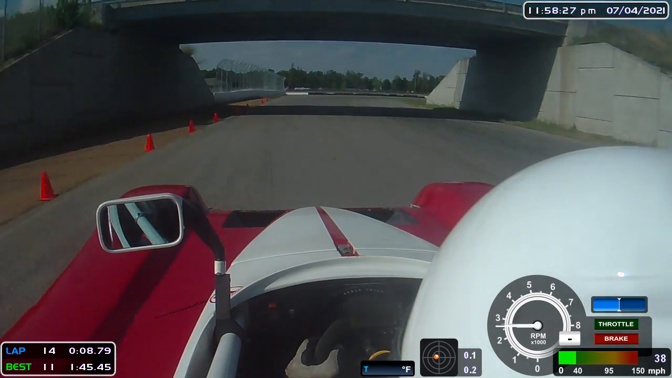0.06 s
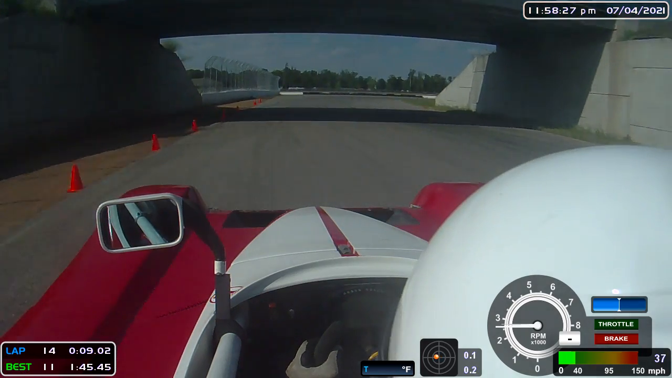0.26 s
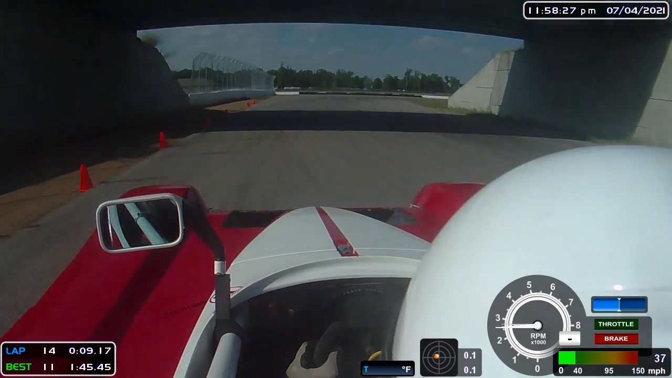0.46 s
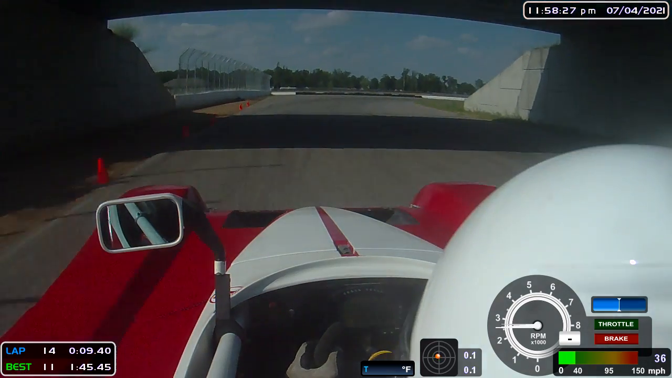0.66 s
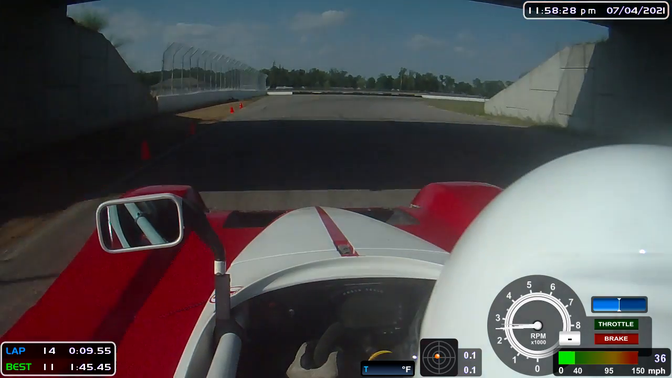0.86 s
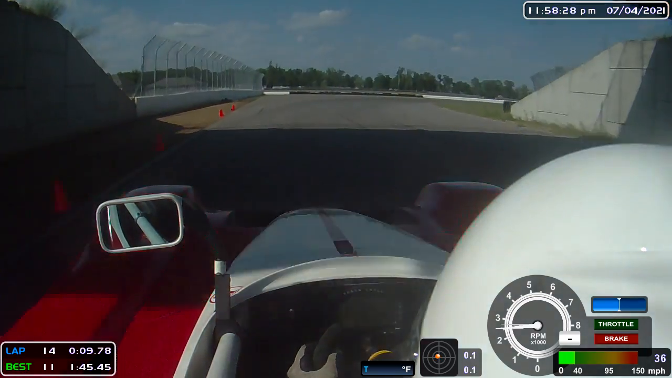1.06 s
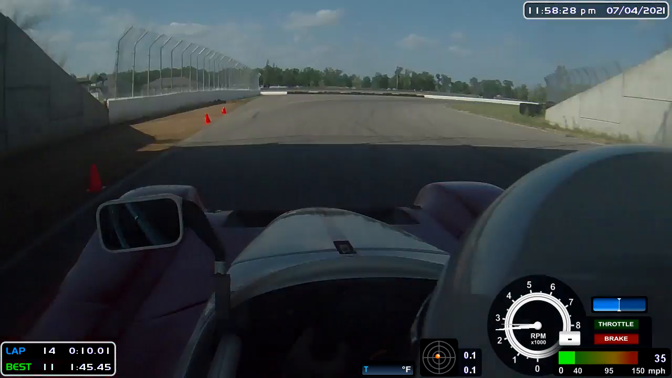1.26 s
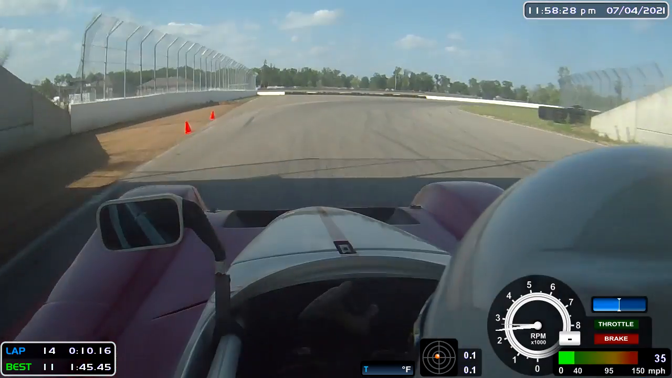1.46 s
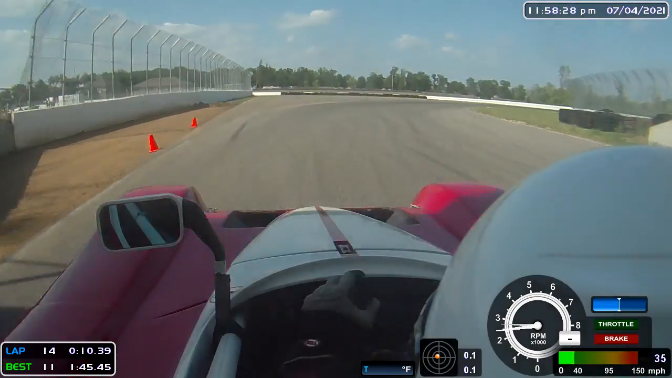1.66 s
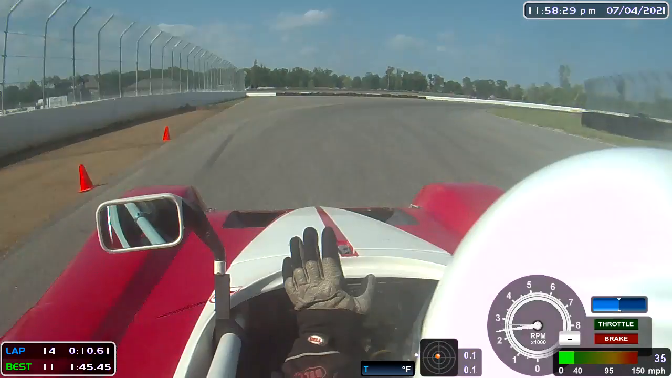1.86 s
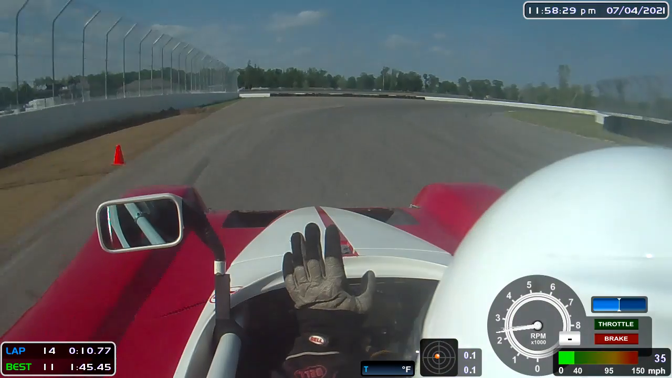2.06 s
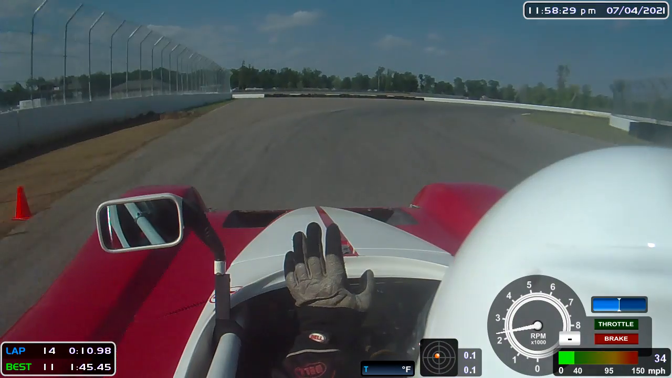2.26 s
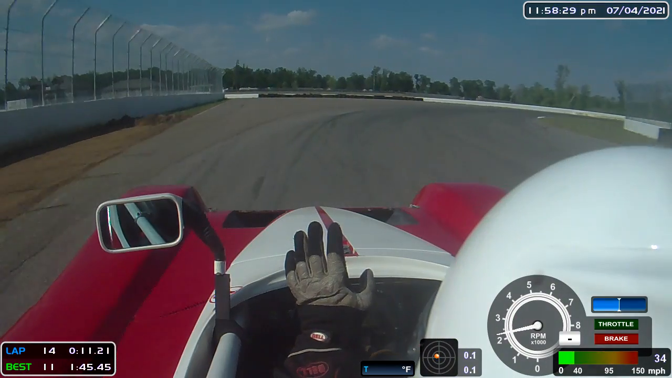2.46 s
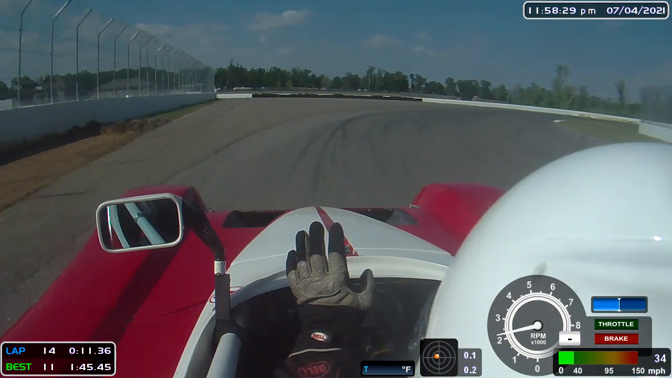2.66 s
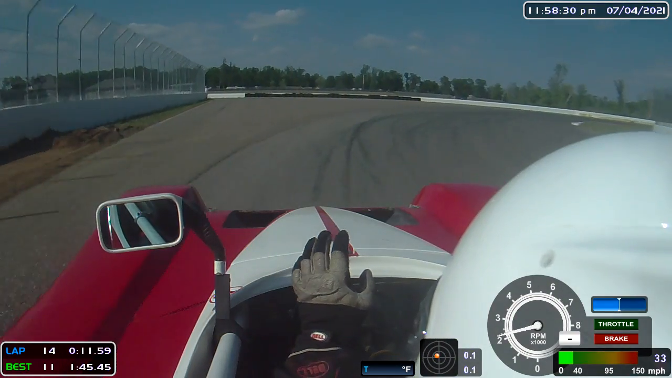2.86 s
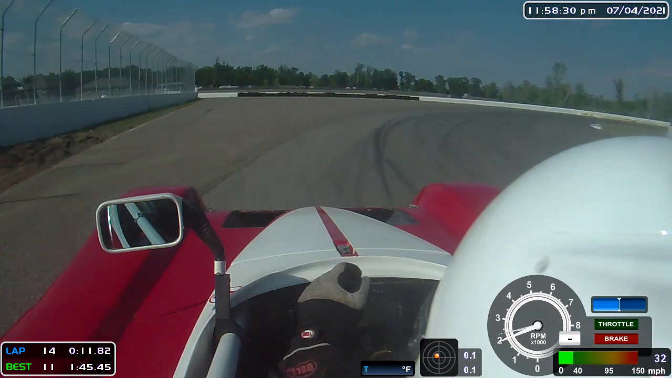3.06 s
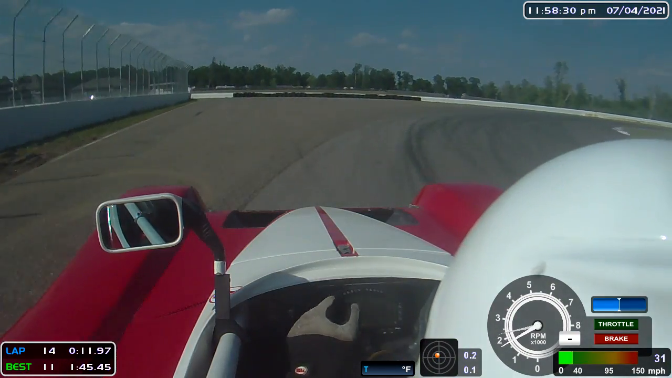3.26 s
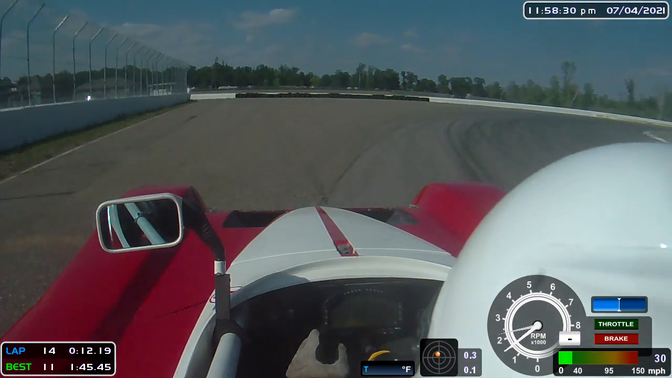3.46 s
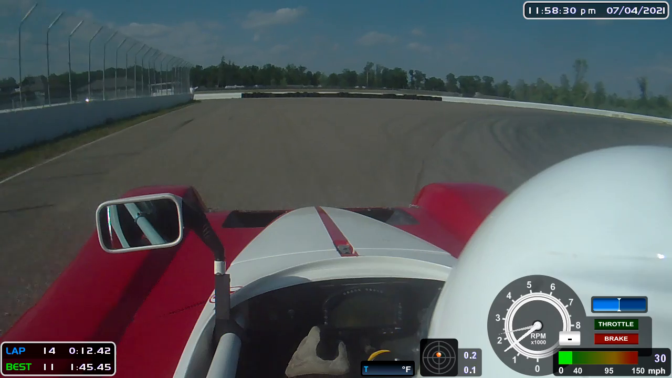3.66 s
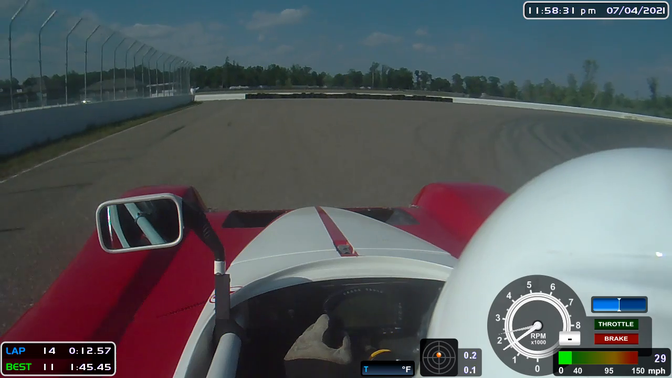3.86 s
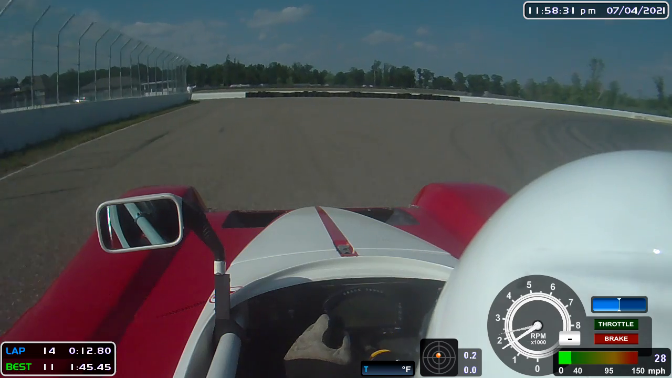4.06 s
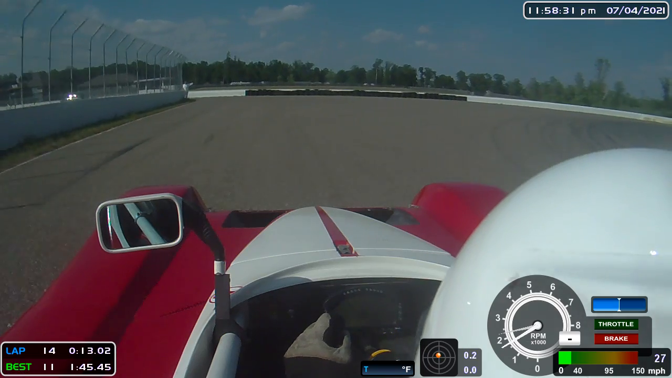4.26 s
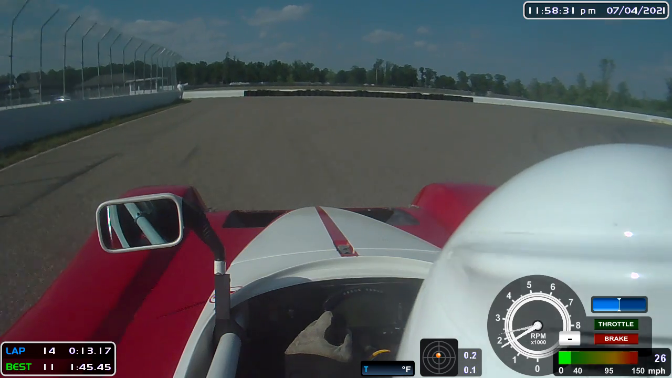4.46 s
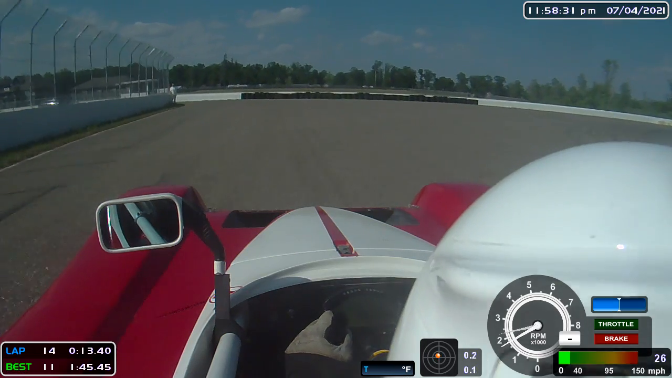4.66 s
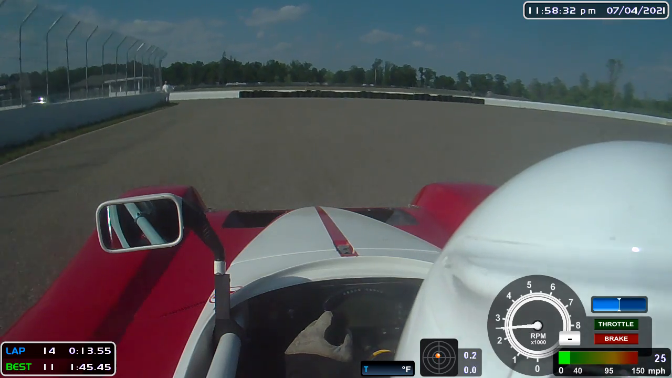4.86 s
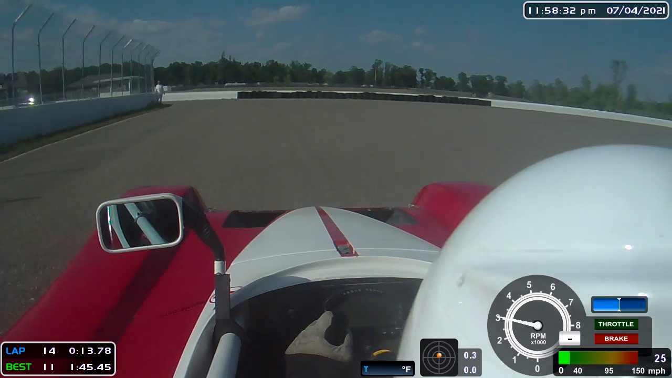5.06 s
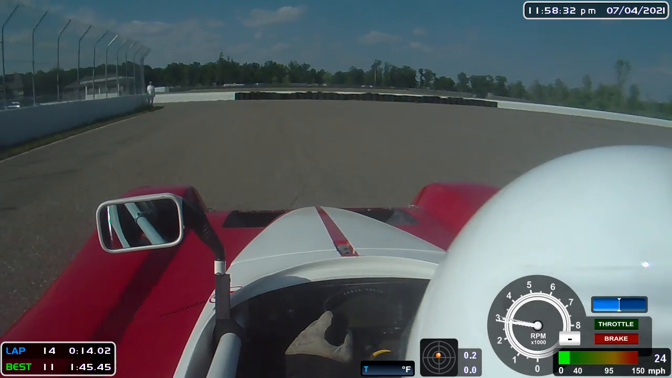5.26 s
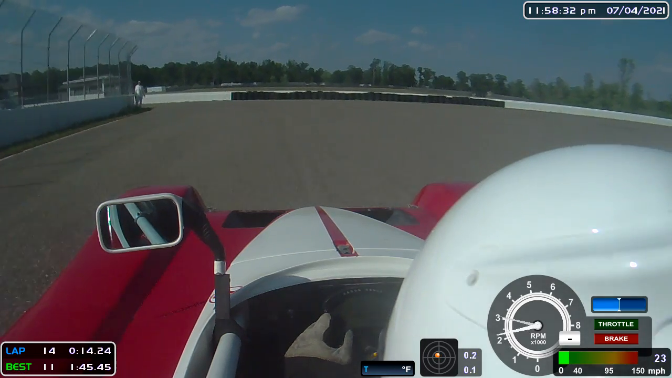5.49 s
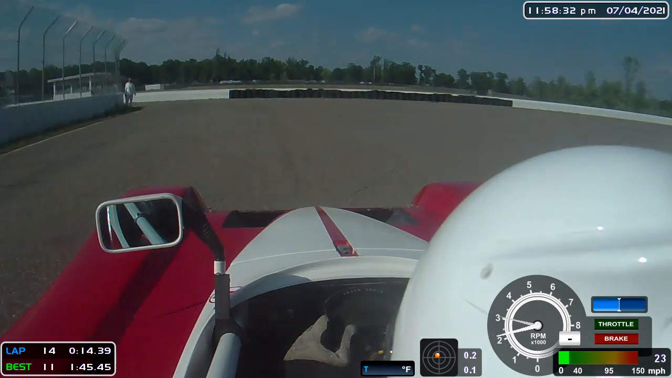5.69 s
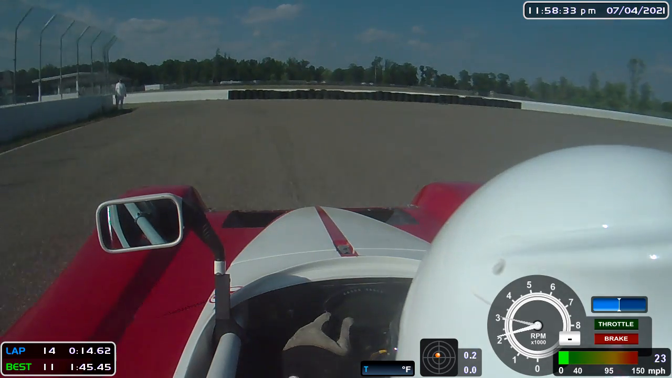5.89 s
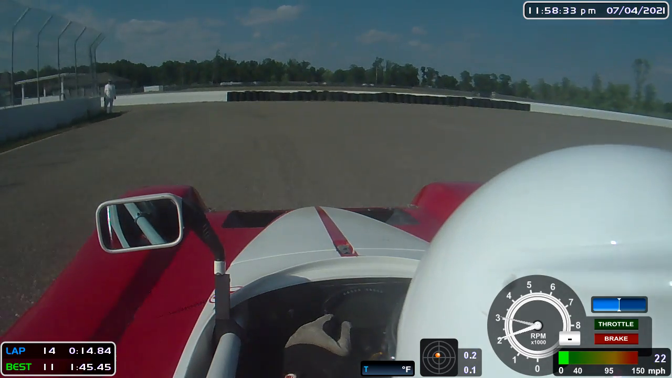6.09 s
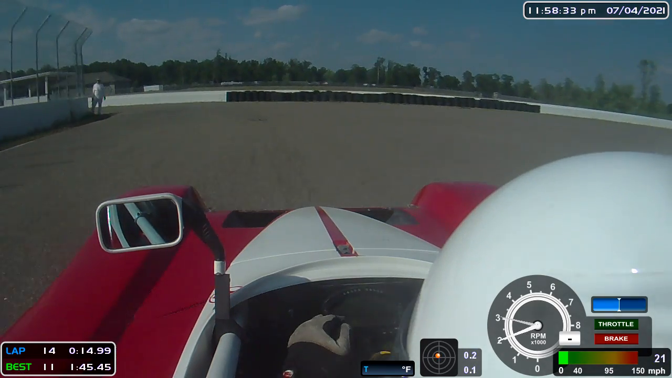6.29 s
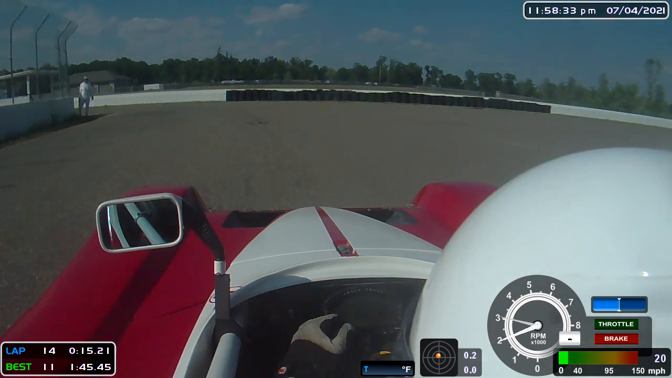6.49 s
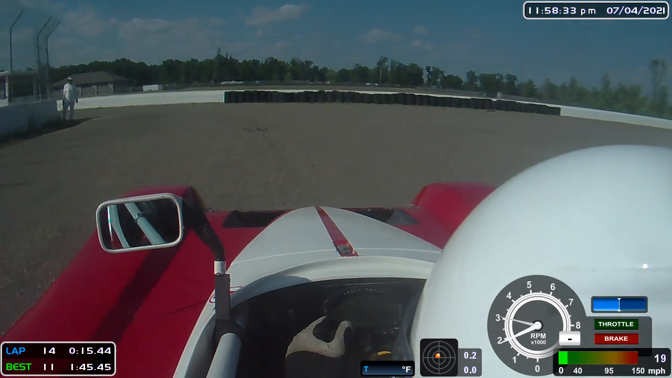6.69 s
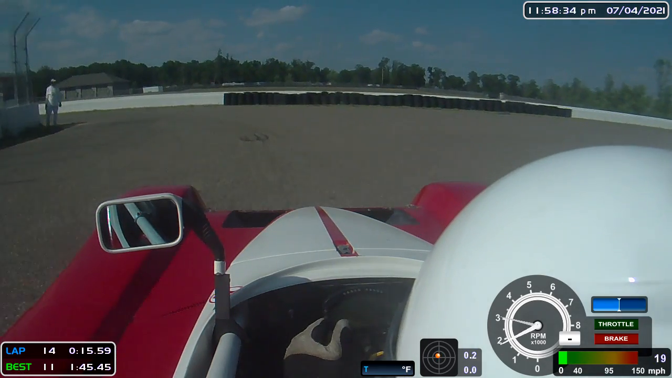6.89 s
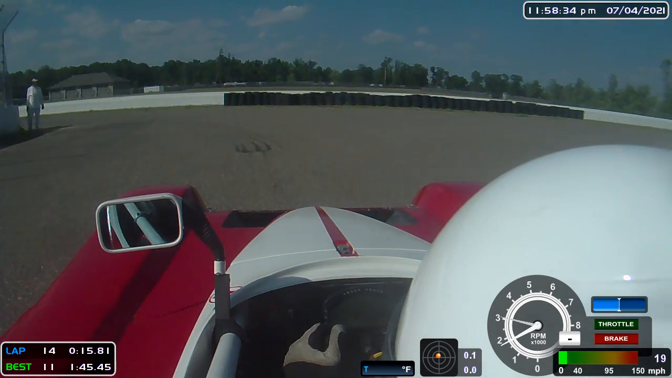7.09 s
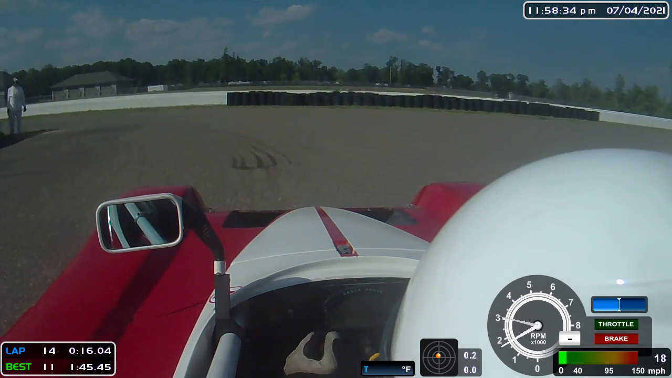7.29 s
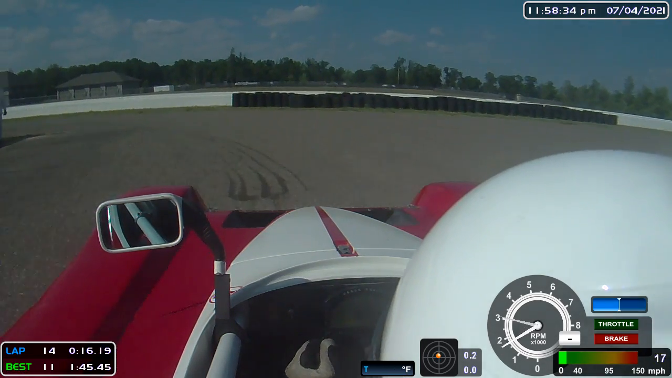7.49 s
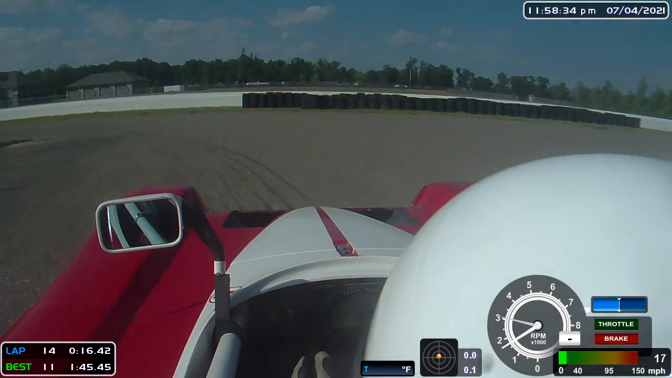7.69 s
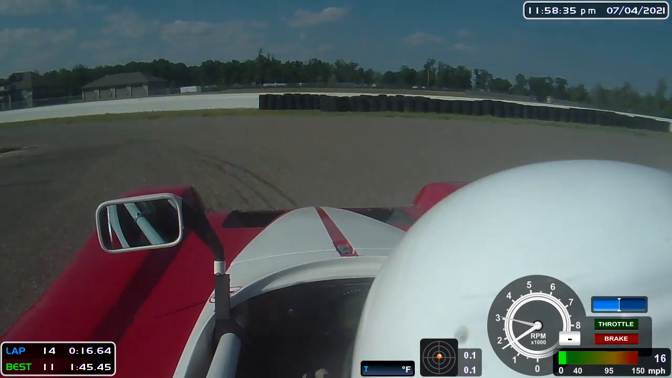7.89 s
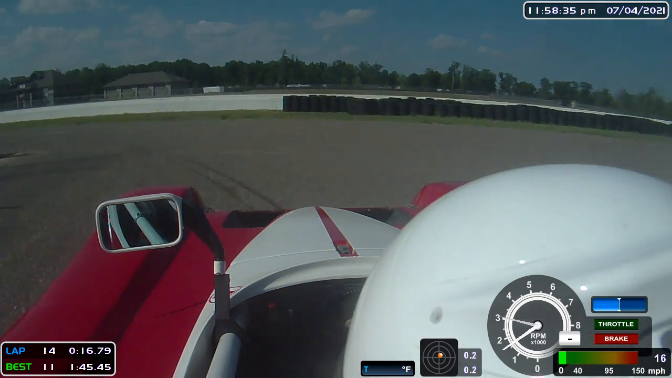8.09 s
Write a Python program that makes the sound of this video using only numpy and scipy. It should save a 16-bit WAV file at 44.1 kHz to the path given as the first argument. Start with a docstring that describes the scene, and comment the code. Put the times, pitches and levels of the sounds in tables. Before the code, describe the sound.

Close in an open cockpit, a four-cylinder engine hums lower over wind and gear rattle, idles with clicks, then flares briefly and sinks.

```python
"""Open race car cockpit, behind the driver's shoulder: the four-cylinder car slows, then rolls on.
The exhaust is harmonics of the firing rate through pipe and cockpit resonances, with noise puffed by each firing.
Revs sink, the note rings under a bridge, gear dogs click as the engine idles out of gear, and a blip follows.
The clutch squeaks in swept harmonics as it bites; gear rattle is noise in casing resonances, wind is low noise."""
import sys
import numpy as np
from scipy import signal
from scipy.fft import rfft, irfft
from scipy.io import wavfile
from scipy.ndimage import uniform_filter1d

SR = 44100
rng = np.random.default_rng(int(sys.argv[2]) if len(sys.argv) > 2 else 0)


def inscribe(sig):
    """Save sig as 16-bit PCM at rate SR to the path in sys.argv[1].

    A 1-D sig is mono; a 2-D sig holds one channel per row.
    Samples are clipped to [-1, 1] before scaling.
    """
    pcm = np.round(np.clip(np.atleast_2d(sig).T, -1, 1) * 32767)
    wavfile.write(sys.argv[1], SR, pcm.astype(np.int16))


N = 358974
T = np.arange(N) / SR

# Engine speed before judder: (time [s], firing rate [Hz])
FIRING_RATE = [(0, 87.5), (.32, 86.6), (1.48, 82.2), (1.77, 80.75), (2.76, 73.76), (3.22, 54.23),
               (3.47, 53.4), (3.9, 56), (4.58, 61.1), (4.69, 84.85), (4.78, 97.7), (4.87, 102.6),
               (5.05, 99.4), (5.17, 89.1), (5.27, 74.94), (5.39, 76.57), (5.74, 72.06), (7.09, 59.87),
               (7.96, 54.7)]
# Exhaust pipe and bodywork response: (frequency [Hz], gain [dB])
PIPE_RESPONSE = [(70,0.5),(120,0),(165,-14.5),(212,-1.5),(250,-3),(283,4.5),(322,-12),(368,-2),(410,-14),(495,-16),(555,-15.5),(630,-23.5),(730,-15),(850,-25.5),(1800,-37)]
# Cockpit resonances, swept by the low overtones: (frequency [Hz], gain [dB])
COCKPIT_RESPONSE = [(105, -38), (118, -34), (136, -36), (147, -42.5), (168, -40.5), (200, -30),
                    (222, -22.5), (243, -30.5), (264, -34), (295, -30.5), (322, -45.5), (350, -28.5),
                    (410, -36.5)]
# Roar of gas, tyres and air: (frequency [Hz], relative spectral level [dB])
ROAR_SPECTRUM = [(200,0.5),(400,-8.5),(650,-10.5),(1000,-7),(1600,-10.5),(2170,-10.5),(2800,-17.5),(3600,-17.5),(4400,-23.5),(6600,-27),(10000,-38),(15000,-58)]
# Gearbox casing resonances: (frequency [Hz], width [Hz], gain [dB])
CASING_MODES = [(3730,400,-1),(5170,520,-2),(5730,13,6.5),(6570,180,-2.5),(7450,180,-3.5),(7970,105,-3),(9190,540,-5.5),(10630,120,-4.5),(12100,220,-9),(14000,700,-19)]
# Broad gear hiss under the resonances: (frequency [Hz], relative spectral level [dB])
GEAR_HISS_SPECTRUM = [(1200,-40),(2200,7.5),(2900,-4),(5000,-10),(9000,-5.5),(13000,-8),(15500,-12)]
# Gear rattle, faintest while the gears are unloaded: (time [s], gain [dB])
RATTLE_GAIN = [(0, -49), (1.7, -48.5), (2.7, -42), (3.06, -47), (3.3, -62), (4.84, -55), (4.95, -46.5),
               (5.85, -43.5), (7.7, -52), (8.14, -56.5)]
# Clutch stick-slip squeaks, level before the fade in and out: (middle [s], half length [s],
# slip rate [Hz], strongest harmonic [number], spread [harmonics], level [dB])
CLUTCH_SQUEAKS = [(2.714, .06, 1258, 6.2, 1.3, -39), (3.292, 0.032, 2080, 0.78, .3, -40.5),
                  (4.455, .035, 3250, 1, .3, -50.5), (4.954, .032, 1174, 3, .72, -40),
                  (4.993, 0.039, 1230, 3.8, 3, -38.5), (5.043, 0.03, 1274, 5, 0.19, -30),
                  (5.072, .02, 1245, 3.4, .3, -50)]
# Gear dogs and linkage, light ticks, level before the envelope: (time [s], level [dB])
DOG_TICKS = [(.584, -47), (.66, -39.5), (1.838, -43), (3.646, -44), (3.755, -52), (3.887, -52),
             (3.957, -48), (4.38, -48), (4.429, -49)]
# Gear change, heavy knocks and scrapes, level before the envelope:
# (time [s], level [dB], ring [Hz], decay [s])
GEAR_KNOCKS = [(3.617, -37, 2870, 0.018), (3.675, -41, 4000, 0.0086), (4.118, -33, 930, 0.012),
               (4.117, -33.5, 279, 0.024), (4.905, -38, 4150, .041)]
# Throttle presses, a trailing one and the blip: (fullest [s], opening time [s], closing time [s],
# depth [0-1], extra bark [dB], extra roar [dB], extra boom [dB])
THROTTLE_PRESSES = [(.3, 0.41, 0.42, 0.34, 11.5, 2.5, -2), (4.74, 0.098, .06, 0.98, 7.5, 15.5, 10)]
# Clean harmonics 2 to 4, before the cockpit response: (level [dB], gain at full throttle [dB],
# gain at idle [dB], gain under the bridge [dB])
OVERTONES = [(1, 3.5, -1.5, 10), (-5.5, 21, -10, 3), (-12, 18, -13.5, -2)]
# Brief dips or swells of the boom: (middle [s], half length [s], gain [dB])
BOOM_DIPS = [(0.599, 0.073, -4.5), (0.775, 0.045, -9.5), (0.886, 0.064, -5.5), (1.678, 0.051, -25),
             (3.313, 0.12, -10), (4.566, 0.026, -6), (4.804, 0.051, -5), (5.163, 0.017, 6.5)]
# Wind buffeting: (frequency [Hz], relative spectral level [dB])
WIND_SPECTRUM = [(20, -15), (55, 2), (120, -4.5), (300, -18.0), (3000, -54.5)]

# Gain laws: (gain at LAW_REFERENCE_HZ [dB], slope [dB/octave of revs], change at idle [dB])
LAW_REFERENCE_HZ = 60
BURBLE_LAW = (-47, 19.8, -5.5)
BARK_LAW = (0.038, 0, 4.6)
ROAR_LAW = (-42.5, 4.1, 0)
BOOM_LAW = (-19, -2, -2.5)

ROAR_FADE_DB_PER_S = 0.6  # as the car loses speed
IDLE_FROM_S, IDLE_TO_S, IDLE_FADE_S = 3.3, 4.6, 0.3  # out of gear
BRIDGE_S, BRIDGE_HALF_S, BRIDGE_BOOM_DB = 1.192, 0.46, 2  # throws the note back
JUDDER_S, JUDDER_HALF_S = 5.16, 0.127  # driveline, while the clutch drags the revs down
PEDAL_LEAD_S = 0.056  # boom and gear lash answer the pedal before the revs do
LASH_DB = -36  # added rattle gain at full throttle
WEAK_BELOW_HZ, WEAK_DB_PER_HZ = 56.65, 2.77  # the boom weakens below this firing rate
BOOM_WAVER_DB = 0.1
TICK_HZ, TICK_DECAY_S, FAINT_TICK_DB = 12600, 0.014, -50
KNOCK_WIDTH_SHARE, TICK_WIDTH_SHARE = .45, .5  # ring filter width / pitch
SQUEAK_GLIDE_SHARE = .009  # pitch rise from the middle to the end, per harmonic of spread
PANEL_HZ, PANEL_WIDTH_HZ, PANEL_DB = 566.7, 32, -57
TREBLE_CUT_HZ = 15720


def undb(db):
    """Decibels to gain."""
    return 10 ** (np.asarray(db) / 20)


def unit(x):
    """Scale to rms 1."""
    return x / np.sqrt(np.mean(x ** 2))


def curves(table):
    """Columns of a table, interpolated linearly in time."""
    time_s, *columns = np.transpose(table)
    return [np.interp(T, time_s, column) for column in columns]


def response(hz, points):
    """Gain at hz of a (frequency [Hz], gain [dB]) table, interpolated in log frequency."""
    point_hz, db = np.transpose(points)
    return undb(np.interp(np.log(hz + 1), np.log(point_hz), db))


def colour(x, points):
    """Filter to rms 1 by a spectrum that falls away steeply below its first point."""
    hz = np.fft.rfftfreq(N, 1 / SR)
    low_cut = np.minimum(hz / points[0][0], 1) ** 2
    return unit(irfft(rfft(x) * response(hz, points) * low_cut, N))


def ring(x, hz, width_hz):
    """One resonance, gain 1 at its centre."""
    hz = min(hz, SR * .45)
    return signal.lfilter(*signal.iirpeak(hz, hz / width_hz, fs=SR), x)


def noise():
    """White noise."""
    return rng.standard_normal(N)


def walk(rate_hz):
    """Smooth random wandering, rms 1."""
    step = max(int(SR / rate_hz), 2)
    held = noise()[np.arange(N) // step]
    return unit(uniform_filter1d(uniform_filter1d(held, step), step))


def swell(middle_s, half_s):
    """Smooth rise to 1 and fall around a moment."""
    return np.exp(-((T - middle_s) / half_s) ** 2)


def puffs(turns, depth):
    """One swell per turn of a phase, rms 1."""
    return unit(np.exp(depth * np.cos(2 * np.pi * turns)))


def wind():
    """Gusty low-frequency buffeting round the open cockpit, slowly fading."""
    return colour(noise(), WIND_SPECTRUM) * undb(-37.5 - 0.18 * T + 2 * walk(12))


def panel():
    """A body panel, shaken by engine and road, hums at its own pitch: twice-filtered noise."""
    hum = ring(ring(noise(), PANEL_HZ, PANEL_WIDTH_HZ), PANEL_HZ, PANEL_WIDTH_HZ)
    return undb(PANEL_DB) * unit(hum)


def clutch(flutter=0.0026, count=10):
    """Slipping plates stick and slip: harmonics of the slip rate, one ringing strongest."""
    out = np.zeros(N)
    k = np.arange(1, count + 1)[:, None]
    waver = 1 + flutter * walk(270)
    for middle_s, half_s, hz, strongest, spread, db in CLUTCH_SQUEAKS:
        near = abs(T - middle_s) < half_s
        u = (T[near] - middle_s) / half_s
        slip_hz = hz * (1 + SQUEAK_GLIDE_SHARE * spread * u) * waver[near]
        angle = 2 * np.pi * np.cumsum(slip_hz) / SR
        weight = np.exp(-((k - strongest) / spread) ** 2 / 2)
        weight = weight + undb(-16) * np.exp(-2 * (k - 2 * strongest) ** 2)
        weight = weight + 0.49 * spread * (k == 1)  # a rasping slip also sounds its own rate
        squeak = unit((weight * np.sin(k * angle)).sum(0))
        out[near] += undb(db) * squeak * np.cos(np.pi * u / 2) ** 4
    return out


def clicks(rise_s=0.0016, count=4):
    """Metal scrapes on metal: decaying noise, narrow in knocks, broad in ticks, some random at idle."""
    out = np.zeros(N)
    t = T[:SR // 5]
    faint = [(s, FAINT_TICK_DB) for s in rng.uniform(IDLE_FROM_S, IDLE_TO_S, count)]
    ticks = [(s, db, TICK_HZ, TICK_DECAY_S) for s, db in DOG_TICKS + faint]
    for time_s, db, hz, decay_s in GEAR_KNOCKS + ticks:
        grit = rng.standard_normal(len(t))
        if hz < 6000:
            width_hz = KNOCK_WIDTH_SHARE * hz
            grit = ring(ring(grit, hz, width_hz), hz, width_hz)
        else:
            grit = ring(grit, hz, TICK_WIDTH_SHARE * hz)
        envelope = (1 - np.exp(-t / rise_s)) * np.exp(-t / decay_s)
        start = int(time_s * SR)
        out[start:start + len(t)] += undb(db) * unit(grit) * envelope
    return out


def gear_rattle(firings, grain=0.09, knocks_hz=60, knock_decay_s=0.03):
    """Teeth chatter with each crank turn, flare as they knock through their slack, and ring the casing."""
    knocks = (rng.random(N) < knocks_hz / SR) * rng.uniform(0, .45, N)
    decay = np.exp(-1 / (knock_decay_s * SR))
    bouts = unit(1 + signal.lfilter([1], [1, -decay], knocks))
    crank_turns = firings / 2
    chatter = noise() * np.exp(grain * walk(1500)) * puffs(crank_turns, depth=0.036) * bouts
    # random signs make the resonances independent
    modes = [undb(db) * ring(chatter * rng.choice([-1, 1], N), hz, width_hz)
             for hz, width_hz, db in CASING_MODES]
    return undb(-2.5) * unit(sum(modes)) + undb(-5.5) * colour(chatter, GEAR_HISS_SPECTRUM)


def presses(lead_s=0):
    """One smooth opening and closing, 0-1, per throttle press."""
    return np.array([swell(s - lead_s, np.where(T + lead_s < s, opening_s, closing_s))
                     for s, opening_s, closing_s, *_ in THROTTLE_PRESSES])


def throttle(lead_s=0):
    """Throttle opening 0-1, and the extra bark, roar and boom in dB that it brings."""
    _, _, _, *effects = np.transpose(THROTTLE_PRESSES)
    return np.array(effects) @ presses(lead_s)


def idling():
    """1 while the engine idles out of gear, else 0, with short fades."""
    return np.clip(np.minimum(T - IDLE_FROM_S, IDLE_TO_S - T) / IDLE_FADE_S + .5, 0, 1)


def law_db(law, hz):
    """Gain in dB that follows the revs and changes at idle."""
    db, octave_db, idle_db = law
    return db + octave_db * np.log2(hz / LAW_REFERENCE_HZ) + idle_db * idling()


def gas_roar(firings, hz):
    """Turbulent gas puffs with each firing, deeper at high revs, rumbling in the pipe and roaring above it."""
    depth = .32 * (hz / hz.max()) ** 3
    gas = noise() * puffs(firings, depth)
    rumble = undb(-8) * colour(gas, PIPE_RESPONSE)
    roar = undb(0.16) * colour(gas * puffs(firings / 2, depth=0.035), ROAR_SPECTRUM)
    return rumble + roar


def exhaust_burble(firings, hz, flicker_db=2.5, whole_db=3, half_db=-4, quarter_db=-4,
                   bark_hz=650, count=108):
    """Harmonics sweep the pipe resonances; four unequal cylinders add three lines between each pair."""
    _, throttle_bark_db, *_ = throttle()
    bark_db = law_db(BARK_LAW, hz) + throttle_bark_db
    wobbles = [walk(24) for _ in range(8)]
    out = 0
    for multiple in np.arange(3, count) / 4:
        if multiple in (1, 2, 3, 4):  # left to exhaust_note
            continue
        line_hz = multiple * hz
        if multiple % 1 == 0:
            db = whole_db + bark_db * np.minimum(line_hz / bark_hz, 1) ** 2
        else:
            db = half_db if multiple % 1 == .5 else quarter_db
        wobble = np.roll(wobbles[rng.integers(len(wobbles))], rng.integers(N))
        # uneven firing times smear the high lines more than the low ones
        smear = .017 * multiple * wobble
        wave = np.cos(2 * np.pi * (multiple * firings + rng.random()) + smear)
        gain = undb(db + flicker_db * wobble[::-1]) * response(line_hz, PIPE_RESPONSE)
        out = out + gain * wave
    return undb(law_db(BURBLE_LAW, hz)) * out


def overtone_gains(hz):
    """Harmonics 2 to 4 follow throttle, idle and bridge, and sweep the cockpit resonances."""
    opening, *_ = throttle()
    idle = idling()
    bridge = swell(BRIDGE_S, BRIDGE_HALF_S)
    gains = []
    for k, (db, throttle_db, idle_db, bridge_db) in enumerate(OVERTONES, 2):
        total_db = db + throttle_db * opening + idle_db * idle + bridge_db * bridge
        gains.append(undb(total_db) * response(k * hz, COCKPIT_RESPONSE))
    return gains


def boom_gain(hz):
    """The first harmonic swells with throttle and bridge, weakens at the lowest revs and wavers."""
    *_, throttle_db = throttle(PEDAL_LEAD_S)
    bridge_db = BRIDGE_BOOM_DB * swell(BRIDGE_S, BRIDGE_HALF_S)
    dips_db = sum(db * swell(middle_s, half_s) for middle_s, half_s, db in BOOM_DIPS)
    weak_db = WEAK_DB_PER_HZ * np.maximum(WEAK_BELOW_HZ - hz, 0)
    waver_db = BOOM_WAVER_DB * walk(6.7)
    return undb(law_db(BOOM_LAW, hz) + throttle_db + bridge_db + dips_db - weak_db + waver_db)


def exhaust_note(firings, hz, shake=0.07, overtone_shake=0.14):
    """The clean lowest four harmonics of the firings: boom and three overtones, shaken in level."""
    angle = 2 * np.pi * firings
    boom = boom_gain(hz) * np.sin(angle)
    overtones = sum(gain * np.sin(k * angle) * (-1) ** (k + 1)
                    for k, gain in enumerate(overtone_gains(hz), 2))
    shaken_boom = boom * (1 + shake * walk(40))
    return np.sqrt(2) * (shaken_boom + overtones * (1 + overtone_shake * walk(40)))


def scene():
    """Engine speed and throttle drive exhaust, roar and rattle; clicks, clutch, panel and wind are added."""
    hz, = curves(FIRING_RATE)
    rattle_db, = curves(RATTLE_GAIN)
    early_pedal, *_ = throttle(PEDAL_LEAD_S)
    rattle_gain = undb(rattle_db) + undb(LASH_DB) * early_pedal ** 3
    _, _, throttle_roar_db, _ = throttle()
    roar_db = law_db(ROAR_LAW, hz) + throttle_roar_db - ROAR_FADE_DB_PER_S * T
    judder = swell(JUDDER_S, JUDDER_HALF_S)
    unsteady_hz = hz * (1 + (.002 + .05 * judder) * walk(45))
    firings = np.cumsum(unsteady_hz) / SR  # phase, 1 per firing
    exhaust = exhaust_note(firings, hz) + exhaust_burble(firings, hz)
    exhaust = exhaust * undb(2 * judder * walk(50))
    background = wind() + panel() + clutch() + clicks()
    gearbox = rattle_gain * gear_rattle(firings)
    return (background + gearbox + undb(roar_db) * gas_roar(firings, hz) + exhaust)[None]


def record(dry):
    """Steep low-pass: no treble above TREBLE_CUT_HZ."""
    return signal.sosfilt(signal.ellip(12, .1, 90, TREBLE_CUT_HZ, fs=SR, output="sos"), dry)


dry = scene()
out = record(dry)
inscribe(out)
```